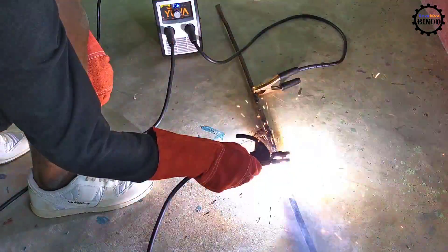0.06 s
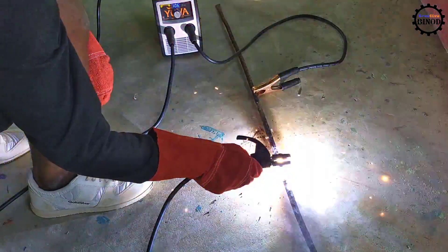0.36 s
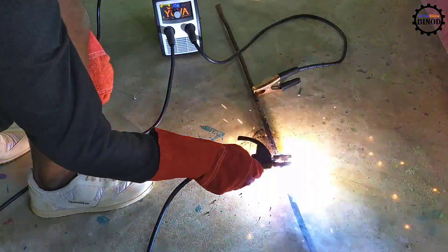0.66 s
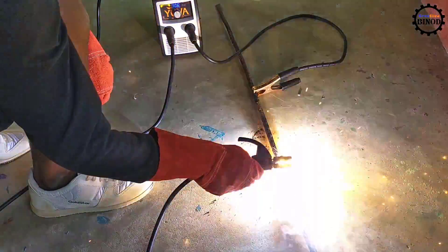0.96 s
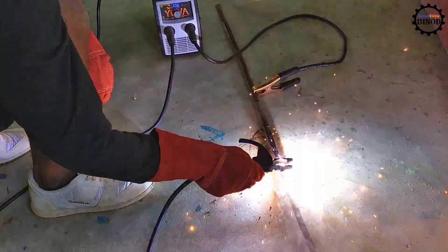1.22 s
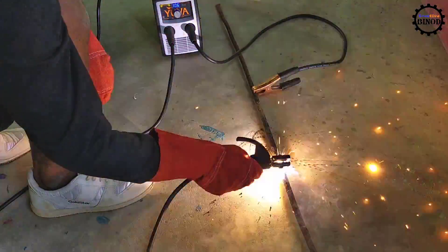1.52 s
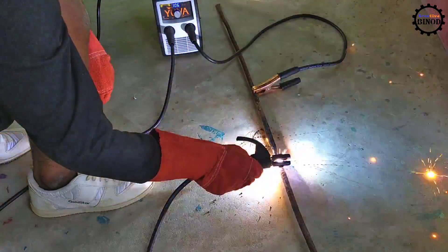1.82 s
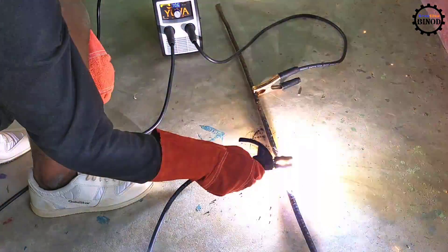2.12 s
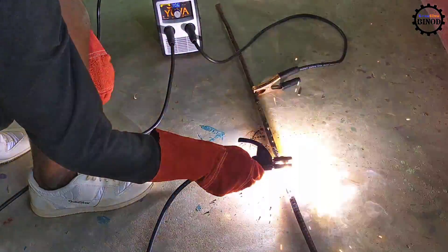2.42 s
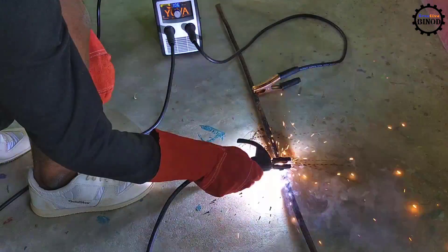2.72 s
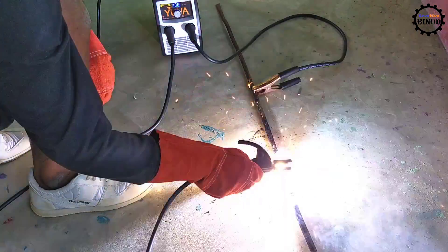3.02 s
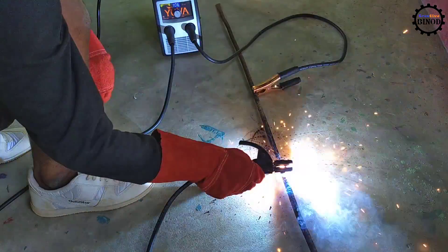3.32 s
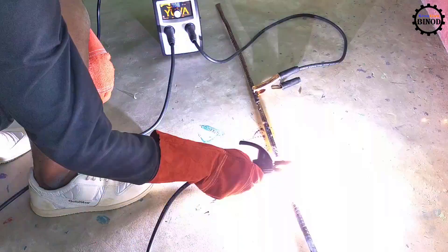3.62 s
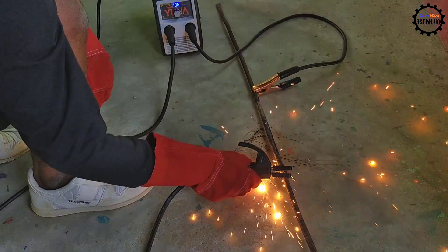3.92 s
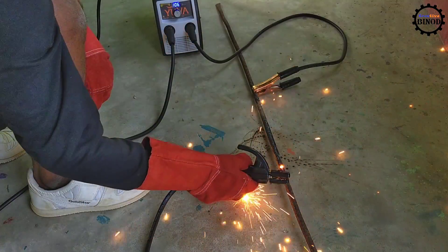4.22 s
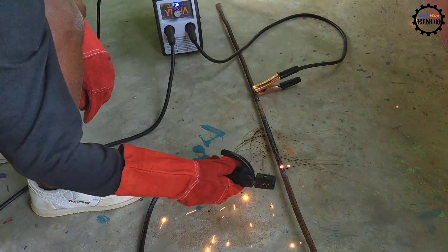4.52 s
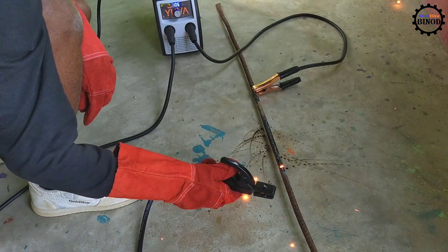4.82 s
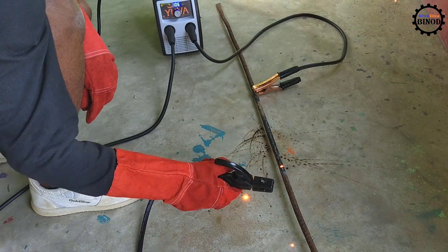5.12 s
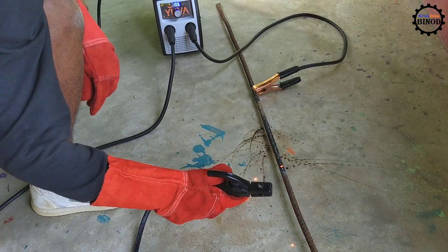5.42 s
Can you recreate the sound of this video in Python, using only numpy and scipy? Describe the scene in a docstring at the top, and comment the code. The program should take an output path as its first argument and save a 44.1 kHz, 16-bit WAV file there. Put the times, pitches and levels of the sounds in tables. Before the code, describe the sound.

From the start, a stick welding arc burns on a steel bar with a bright, frying sizzle, a low sputter and sharp, irregular pops of bursting metal. It grows stronger around 1 second, gives a heavy pop near 1.4 seconds, then drops to a thin crackle. At about 2 seconds it builds again, with a cluster of pops near 2.8 seconds. It almost dies at 3.5 seconds, surges once more and breaks with a loud crack at 3.8 seconds. Leftover sparks fizz faintly, swelling around 4.5 seconds and fading after 5. The electrode holder gives a small double click at about 4.6 seconds. The welder's cooling fan hums quietly underneath, dipping after loud bursts and rising back to a steady, airy hum until the end, near 5.5 seconds. Everything is close and in wide stereo, with short workshop reverberation.

```python
"""A welding arc sizzles and spits on a steel bar on a workshop floor; drops of metal burst with sharp pops.
The arc breaks with a crack, the last sparks fizz out and the stick electrode's holder clicks.
The welder's seven-blade cooling fan hums steadily; its level dips after some loud bursts and climbs back
as the recorder's gain recovers. Heard from above through two close microphones with a stereo widener."""
import sys
import numpy as np
from scipy import signal
from scipy.fft import rfft, irfft, next_fast_len
from scipy.io import wavfile
from scipy.ndimage import uniform_filter1d

SR = 44100
rng = np.random.default_rng(int(sys.argv[2]) if len(sys.argv) > 2 else 0)


def int16_out(signal):
    """Quantize to a 16-bit WAV file."""
    q = np.round(np.clip(np.atleast_2d(signal).T, -1, 1) * 32767)
    wavfile.write(sys.argv[1], SR, q.astype(np.int16))


N = 245195
TIME_S = np.arange(N) / SR
ARC_BREAK_S = 3.8159
SPOT_COUNT = 8  # burst positions around the electrode
MIC_GAP_M = .14


def from_db(db):
    """Decibels to gain."""
    return 10 ** (np.asarray(db) / 20)

def unit_rms(x):
    """Scale to rms 1."""
    return x / np.sqrt(np.mean(x ** 2) + 1e-20)

def in_time(curve):
    """A (time_s, value) table at every sample."""
    return np.interp(TIME_S, *np.transpose(curve))

def at_hz(curve, hz):
    """Read a table on a log-frequency axis."""
    freq_hz, values = np.transpose(curve)
    return np.interp(np.log(np.maximum(hz, 1)), np.log(freq_hz), values)

def drift(rate_hz):
    """Smooth random wander, rms 1."""
    pole = np.exp(-20 * np.pi * rate_hz / SR)  # runs at SR / 10
    noise = rng.standard_normal(N // 10 + 8002)
    slow = signal.lfilter([1], [1, -2 * pole, pole * pole], noise)[8000:]
    return np.interp(np.arange(N) / 10, np.arange(len(slow)), unit_rms(slow))

def colour(x, spectrum):
    """Apply a smooth spectrum; rms 1."""
    size = next_fast_len(N)
    gain = from_db(at_hz(spectrum, np.fft.rfftfreq(size, 1 / SR)))
    return unit_rms(irfft(rfft(x, size) * gain, size)[..., :N])

def band(x, low_hz, high_hz, order=1):
    """Causal band-pass."""
    sos = signal.butter(order, [low_hz, min(high_hz, .45 * SR)], "band", fs=SR, output="sos")
    return signal.sosfilt(sos, x + 1e-18)

def delay(x, samples):
    """Whole-sample delay."""
    lag = max(int(round(samples)), 1)
    return np.concatenate([np.zeros_like(x[..., :lag]), x[..., :-lag]], axis=-1)

def fade(clicks, decay_s):
    """Each click starts an exponential decay."""
    return signal.lfilter([1], [1, -np.exp(-1 / (decay_s * SR))], clicks + 1e-18)

def through(x, response):
    """Convolve with a stereo response scaled to energy 1."""
    response = unit_rms(response) / np.sqrt(response.shape[1])
    return signal.oaconvolve(x[None], response, axes=1)[:, :N]

def diffuse(size):
    """Noise from all directions at two microphones: alike in the bass, unrelated in the treble."""
    coherence = np.sinc(2 * np.fft.rfftfreq(size, 1 / SR) * MIC_GAP_M / 343)
    mid, side = rfft(rng.standard_normal((2, size)))
    return irfft(np.sqrt(1 + coherence) * mid + np.sqrt(1 - coherence) * side * [[1], [-1]], size)

def grains(per_s, spread_db):
    """Random clicks, many small and a few large."""
    sizes = from_db(spread_db * np.minimum(rng.exponential(1, N), 5))
    signs = rng.choice([-1, 1], N)
    return sizes * signs * (rng.random(N) < per_s / SR)

def strikes(start_s, level_db):
    """One click per event."""
    clicks = np.zeros(N)
    clicks[np.round(start_s * SR).astype(int)] = from_db(level_db)
    return clicks

def scattered(clicks):
    """Deal each click to a random spot: spots x N."""
    return clicks * (rng.integers(0, SPOT_COUNT, N) == np.arange(SPOT_COUNT)[:, None])

def frying(clicks, spectrum):
    """Coloured clicks from all spots; together rms 1."""
    return colour(scattered(clicks), spectrum) / np.sqrt(SPOT_COUNT)


# start_s, gain_db
GAIN_DIPS = [(0, -16), (1.41, -13.5), (2.66, -9.5), (3.1, -9), (3.44, -13.5), (3.82, -11.9)]

def recorder_gain_db(recovery_db_per_s=9.4, dip_s=.06):
    """The recorder's gain on the hum: dips at the listed times, then recovers steadily."""
    gain_db = np.zeros(N)
    for start_s, low_db in GAIN_DIPS:
        gain_db = np.where(TIME_S >= start_s, low_db + recovery_db_per_s * (TIME_S - start_s), gain_db)
    return uniform_filter1d(gain_db, size=int(dip_s * SR))

# air rush spectrum: freq_hz, level_db
FAN_AIR = [(30, -107), (60, -82.5), (105, -73.5), (150, -85), (230, -80), (320, -84.5), (430, -79.5),
           (650, -86), (1000, -87), (1600, -86), (2600, -92.5), (5000, -94.5), (10000, -108), (15500, -108)]
# slight slowing under load: time_s, turns_per_s
FAN_SPEED = [(0.6, 65.94), (1.1, 65.9), (1.7, 65.69), (2.6, 65.61), (4.3, 65.63), (5.2, 65.66)]
# blade (multiples of 7) and motor (of 4) tones: cycles_per_turn, level_db, pan_left_db, left_lead_rad
FAN_TONES = [(4, -56.5, -2, -0.2), (7, -59, 1, -0.9), (8, -52, 2, 0.2), (14, -49, 2, -0.4),
             (20, -65.5, 1, 0.6), (21, -60.3, 8, 2.0), (24, -60.2, 2, 1.2), (28, -58.2, 5, -0.6),
             (35, -65, -1, 1.5), (42, -68.5, 9, 0.9), (48, -78, 3, 0.1), (49, -75, -2, 1.5),
             (56, -75, 1, 0.6)]

def fan(tones_db, air_db, waver_db, wobble):
    """Blade and motor tones over the rush of air through the welder's case."""
    turns = np.cumsum(in_time(FAN_SPEED) * (1 + wobble * drift(4.3))) / SR
    sides = np.array([[.5], [-.5]])
    tones = 0
    for cycles_per_turn, level_db, pan_left_db, left_lead_rad in FAN_TONES:
        gain = from_db(level_db + tones_db + pan_left_db * sides + waver_db * drift(17))
        phase = 2 * np.pi * (cycles_per_turn * turns + rng.random())
        tones = tones + gain * np.sqrt(2) * np.sin(phase + left_lead_rad * sides)
    air = from_db(air_db) * colour(diffuse(next_fast_len(N)), FAN_AIR)
    return (tones + air) * from_db(recorder_gain_db())


# reverberation decay: freq_hz, t60_s
ROOM_T60 = [(100, 0.39), (1000, 0.35), (5000, 0.32), (15000, 0.23)]
# reverberation spectrum: freq_hz, level_db
ROOM_COLOUR = [(100, 6), (1500, 4.5), (6000, 0)]

def room_tail(predelay_s=.004):
    """Workshop reverberation, stronger and longer in the bass."""
    t = np.arange(SR // 2) / SR
    edges_hz = np.geomspace(25, 19000, 9)
    tail = 0
    for low_hz, high_hz in zip(edges_hz, edges_hz[1:]):
        centre_hz = np.sqrt(low_hz * high_hz)
        level_db = at_hz(ROOM_COLOUR, centre_hz) - 60 * t / at_hz(ROOM_T60, centre_hz)
        tail = tail + band(diffuse(len(t)), low_hz, high_hz, order=2) * from_db(level_db)
    return delay(tail, predelay_s * SR)

def near_scatter(t60_s=.014):
    """Quick reflections off the glove and the bar."""
    t = np.arange(SR // 50) / SR
    return band(diffuse(len(t)), low_hz=1200, high_hz=18000) * from_db(-60 * t / t60_s)

# workshop resonances: pitch_hz, level_db
ROOM_MODES = [(181, -1.5), (620, -29), (663, -11), (749, 5), (809, 7.5), (872, -4), (975, -7), (1027, 7),
              (1295, 5.5), (1517, -0.5), (1727, 6)]

def workshop(spots, scatter_db, tail_db, bounce_db, shade_db, mode_width_hz=15):
    """Direct sound, a bounce off the worker's leg, scatter, reverberation and room resonances."""
    mono = spots.sum(axis=0)
    # the left microphone faces the weld; the right is shaded in the treble
    treble = band(mono, low_hz=1290, high_hz=18500)
    direct = np.array([mono, mono - (1 - from_db(-shade_db)) * treble])
    bounce_s = (.00136, .00145)
    bounce = np.array([delay(side, lag_s * SR) for side, lag_s in zip(direct, bounce_s)])
    scatter = sum(through(spot, near_scatter()) for spot in spots)
    scatter_gain = from_db([[scatter_db], [scatter_db - 1.5]])
    tail = sum(through(pair, room_tail()) for pair in spots[::2] + spots[1::2])
    ringing = sum(from_db(level_db) * band(mono, hz - mode_width_hz / 2, hz + mode_width_hz / 2)
                  for hz, level_db in ROOM_MODES)
    return direct + from_db(bounce_db) * bounce + scatter_gain * scatter + from_db(tail_db) * tail + ringing


# start_s, level_db
HOLDER_CLICKS = [(4.5524, -37.5), (4.556, -49), (4.585, -43), (4.585, -40.5)]

def holder(gain_db):
    """The electrode holder clicks as it is drawn back."""
    start_s, level_db = np.transpose(HOLDER_CLICKS)
    return band(scattered(strikes(start_s, level_db + gain_db)), low_hz=2780, high_hz=12800)


# freq_hz, level_db
FIZZ_SPECTRUM = [(500, -26), (2000, -13), (4000, 4), (5800, 6), (7500, 1), (11000, -2), (15500, 2)]

def sparks(level_db, full_s=4.45, hold_s=.37, rise_db_per_s=24, fall_db_per_s=45):
    """Glowing spatter fizzes on the floor: builds, holds, dies away."""
    t = TIME_S - full_s
    shower_db = rise_db_per_s * np.minimum(t, 0) - fall_db_per_s * np.maximum(t - hold_s, 0)
    return frying(grains(per_s=2700, spread_db=3), FIZZ_SPECTRUM) * from_db(level_db + shower_db)


# largest drops: start_s, crack_db, thump_db
POPS = [(0.0697, -24, -42), (0.3348, -29, -43), (0.4949, -27, -43), (0.5026, -27, -44),
        (0.7735, -27.5, -42), (1.2279, -27, -36), (1.3794, -20, -24), (1.4119, -22, -31),
        (1.4709, -27.5, -43), (1.7074, -34, -48), (1.8359, -37, -50), (2.0288, -24.5, -40),
        (2.2344, -27.5, -44), (2.4557, -26, -41), (2.5184, -28, -39), (2.5415, -30, -44),
        (2.6595, -22.5, -44), (2.7941, -24, -40), (2.7958, -29, -43), (2.8044, -25.5, -35),
        (2.8447, -28, -43), (2.8952, -24.5, -49), (2.9044, -30, -48), (2.9126, -28, -47),
        (3.0329, -26, -45), (3.0655, -26, -32), (3.2652, -27, -36), (3.2956, -27, -40), (3.4057, -31, -48),
        (3.4449, -31, -47), (3.4471, -25.5, -48), (3.4759, -27.5, -50), (3.6263, -35, -52),
        (3.8164, -22, -33)]

def pops(crack_gain_db, thump_gain_db, spit_gain_db):
    """Large drops short the gap and burst, a bright crack over a thump; small ones spit at random."""
    start_s, crack_db, thump_db = np.transpose(POPS)
    burning = TIME_S < ARC_BREAK_S
    spits = burning * grains(per_s=40, spread_db=1) * from_db(in_time(ARC_STRENGTH) + spit_gain_db)
    bursts = strikes(start_s, crack_db + crack_gain_db) + spits
    crack = band(scattered(bursts), low_hz=2800, high_hz=17400)
    thump = band(scattered(strikes(start_s, thump_db + thump_gain_db)), low_hz=510, high_hz=1700)
    return crack + thump

def arc_break(level_db):
    """The stretched arc snaps with one broad crack."""
    return band(scattered(strikes(np.array([ARC_BREAK_S]), level_db)), low_hz=800, high_hz=12900)


# start_s, length_s, level_db
GAS_GUSTS = [(0.27, 0.33, -57), (0.808, 0.11, -43.5), (1.11, 0.24, -43), (1.358, 0.032, -39),
             (2.414, 0.06, -51), (2.557, 0.06, -45.5), (2.79, 0.03, -48), (3.045, 0.033, -40),
             (3.24, 0.09, -45.5), (3.785, 0.03, -48)]

def gusts(attack_s=.0013, release_s=.0057):
    """Envelope of gas gusts from the electrode's coating."""
    envelope = 0
    for start_s, length_s, level_db in GAS_GUSTS:
        rise = np.clip((TIME_S - start_s) / attack_s, 0, 1)
        fall = np.exp(-np.maximum(TIME_S - start_s - length_s, 0) / release_s)
        envelope = envelope + from_db(level_db) * rise * fall
    return envelope


SPUTTER_DB, SPUTTER_FOLLOWS, USUAL_ARC_DB = -51.5, .19, -42
# time_s, level_db
ARC_STRENGTH = [(0.0, -48.5), (0.14, -47), (0.25, -51), (0.3, -40), (0.47, -45.5), (0.5, -38.5),
                (0.52, -42), (0.78, -44.5), (0.83, -40), (0.98, -36.3), (1.08, -39.5), (1.15, -36),
                (1.33, -39.5), (1.36, -36.5), (1.379, -32.5), (1.39, -35.5), (1.411, -38), (1.415, -51),
                (1.69, -54.5), (1.76, -50), (2.025, -50.5), (2.032, -44.5), (2.13, -43.5), (2.31, -39.5),
                (2.6, -38.8), (2.656, -41), (2.663, -47.5), (2.82, -44.5), (2.88, -49), (3.02, -42),
                (3.06, -38), (3.16, -40), (3.31, -36.5), (3.4, -44), (3.5, -60), (3.6, -55), (3.68, -39),
                (3.78, -36.5), (3.812, -34)]
# freq_hz, level_db
SIZZLE_SPECTRUM = [(300, 1), (900, -3.5), (1400, 1), (2300, -4.5), (3200, 1), (4500, -2), (6500, 5),
                   (8300, 3.5), (11000, 4.5), (13000, 2), (15300, 6.5)]
# freq_hz, level_db
SPUTTER_SPECTRUM = [(30, -50), (60, -1), (110, 3.5), (140, -2), (175, 7), (215, -4.5), (260, 3.5),
                    (330, -4), (550, -7), (800, -4), (1100, -6.5), (1500, -6), (2500, -6.5), (6000, -10)]

def arc(sizzle_gain_db, sputter_gain_db, flutter_db, boil_db, quench_db):
    """Micro-explosions in the arc make the sizzle; the heaving gas column sputters below it."""
    arc_db = in_time(ARC_STRENGTH)
    gas = from_db(SPUTTER_DB + SPUTTER_FOLLOWS * (arc_db - USUAL_ARC_DB)) + gusts()
    burning = TIME_S < ARC_BREAK_S
    # each large drop bridges the gap and chokes the arc just before it bursts
    drops = strikes(np.array(POPS)[:, 0], level_db=0)
    quench = from_db(quench_db * fade(drops[::-1], decay_s=.005)[::-1])
    flutter = from_db(flutter_db * drift(74))
    ticks = grains(per_s=11000, spread_db=3)
    puffs = grains(per_s=3000, spread_db=2.2)
    sizzle = frying(ticks, SIZZLE_SPECTRUM) * from_db(arc_db + sizzle_gain_db)
    sputter = frying(puffs, SPUTTER_SPECTRUM) * gas * from_db(sputter_gain_db + boil_db * drift(15))
    return burning * quench * flutter * (sizzle + sputter)


def scene():
    """Weld, sparks and holder in the workshop, over the fan."""
    spots = arc(sizzle_gain_db=-1.56, sputter_gain_db=-3, flutter_db=1.46, boil_db=2.5, quench_db=-4)
    spots += arc_break(level_db=-9)
    spots += pops(crack_gain_db=8.8, thump_gain_db=20, spit_gain_db=13)
    spots += sparks(level_db=-63)
    spots += holder(gain_db=11.5)
    room = workshop(spots, scatter_db=.3, tail_db=-3, bounce_db=-9, shade_db=5)
    return room + fan(tones_db=-.9, air_db=-50.6, waver_db=1, wobble=.00054)

def record(dry):
    """Widener: subtract from each channel a late, dull copy of the other; then low-pass."""
    crossfeed, spill, lag_samples, cutoff_hz = .94, .195, 19, 15500
    dull = dry + spill * (np.roll(dry, 1, axis=1) + np.roll(dry, -1, axis=1) - 2 * dry)
    wide = dry - crossfeed * delay(dull[::-1], lag_samples)
    return signal.sosfilt(signal.ellip(12, .2, 80, cutoff_hz, fs=SR, output="sos"), wide)


dry = scene()
out = record(dry)
int16_out(out)
```